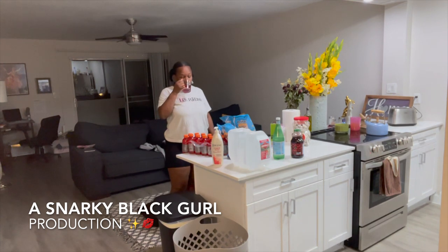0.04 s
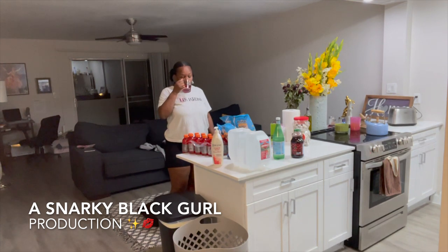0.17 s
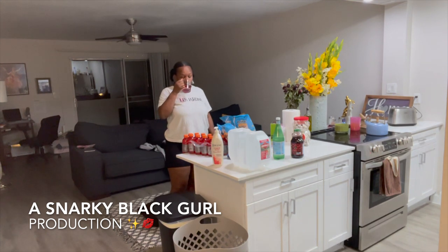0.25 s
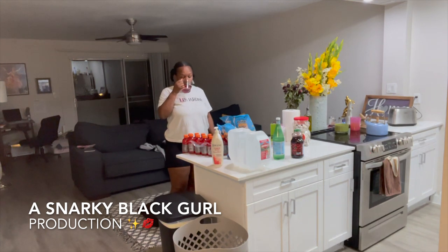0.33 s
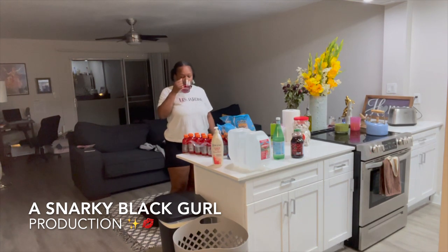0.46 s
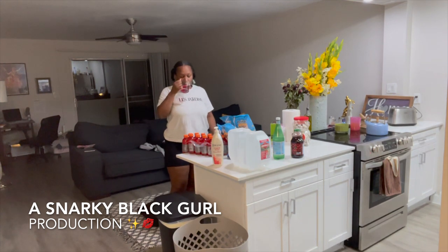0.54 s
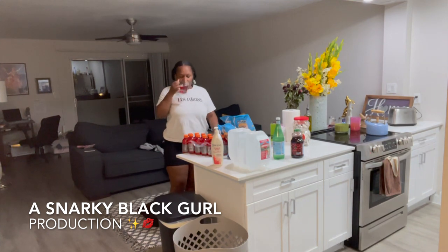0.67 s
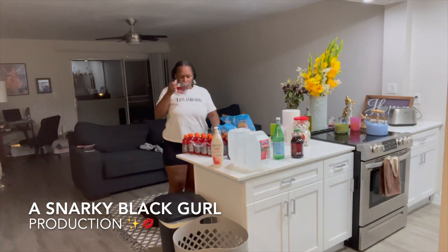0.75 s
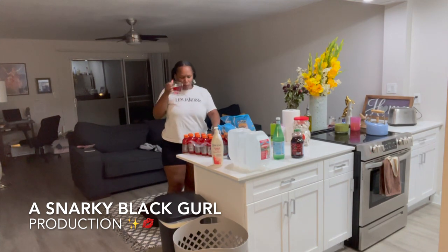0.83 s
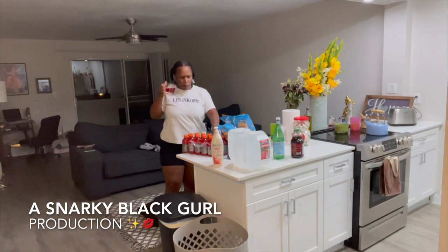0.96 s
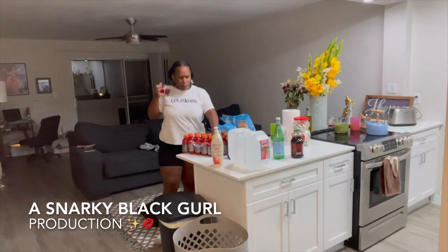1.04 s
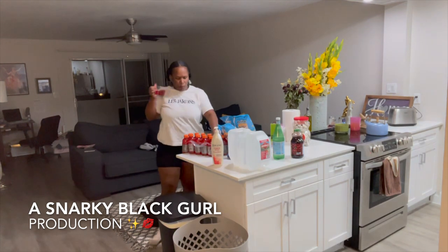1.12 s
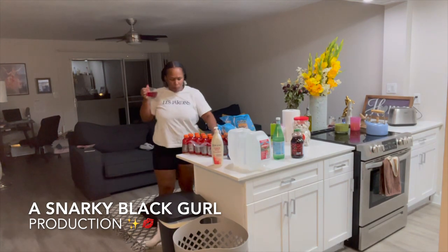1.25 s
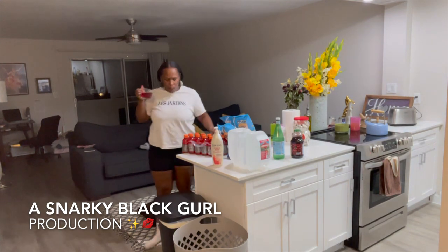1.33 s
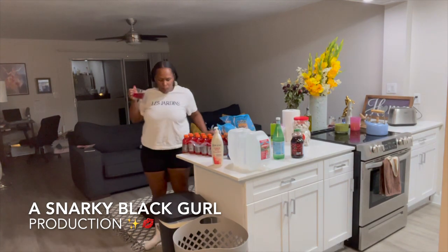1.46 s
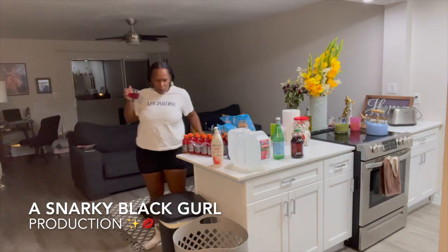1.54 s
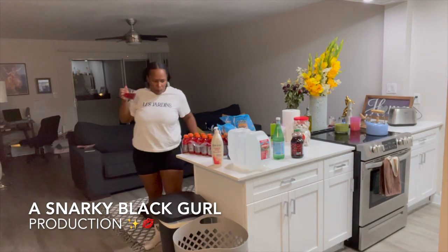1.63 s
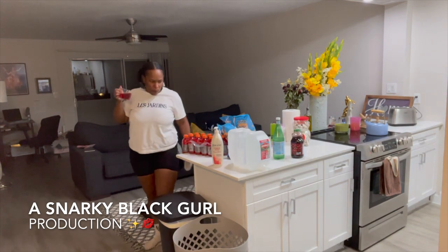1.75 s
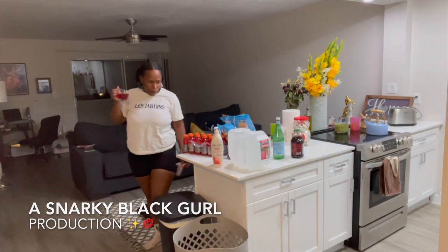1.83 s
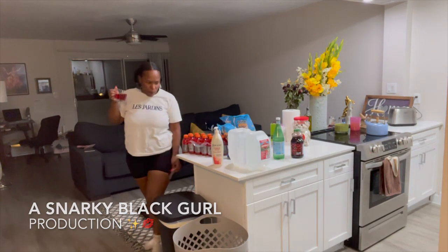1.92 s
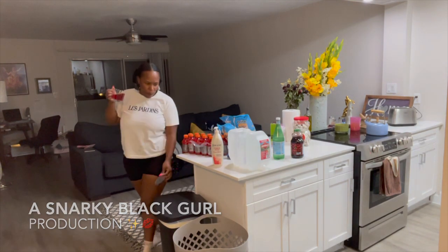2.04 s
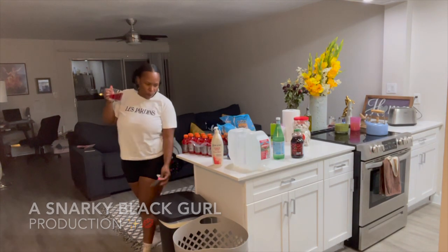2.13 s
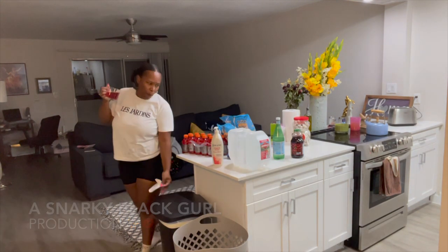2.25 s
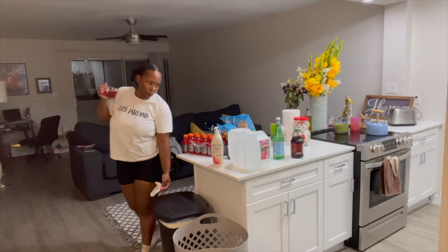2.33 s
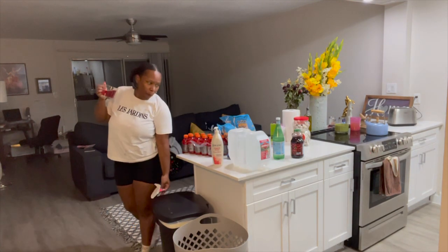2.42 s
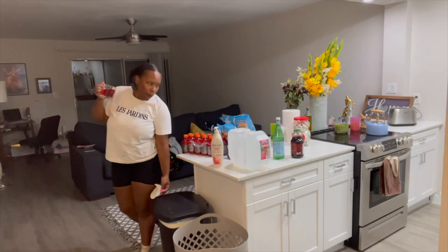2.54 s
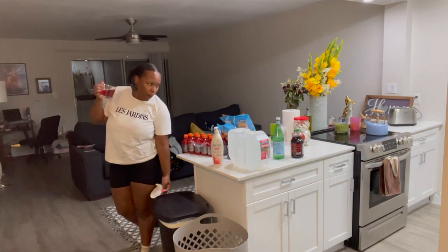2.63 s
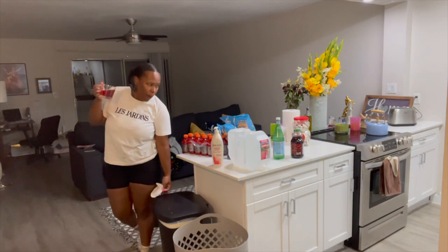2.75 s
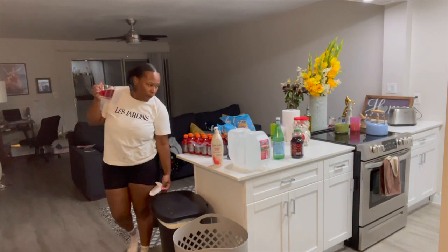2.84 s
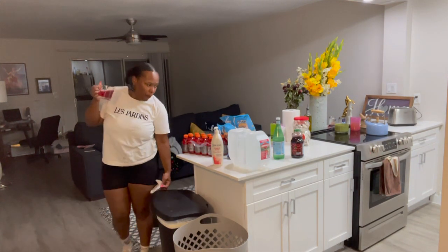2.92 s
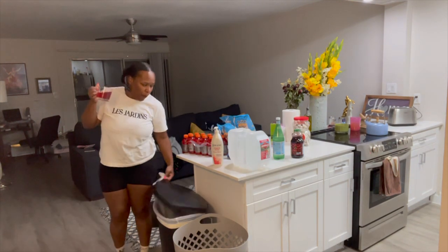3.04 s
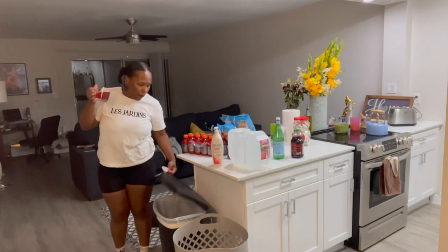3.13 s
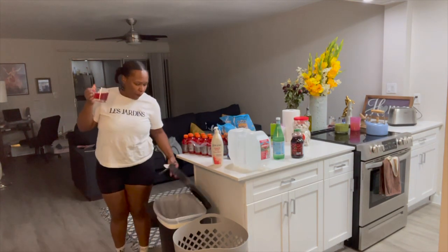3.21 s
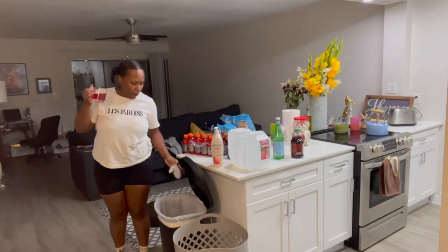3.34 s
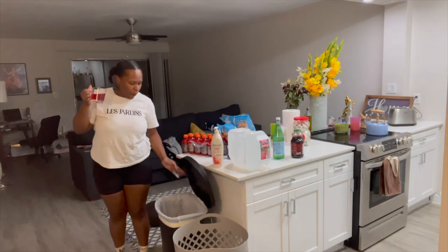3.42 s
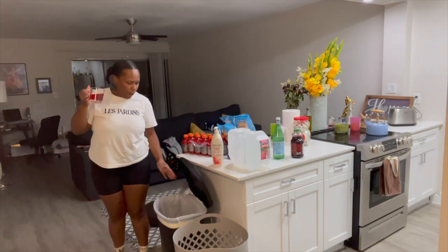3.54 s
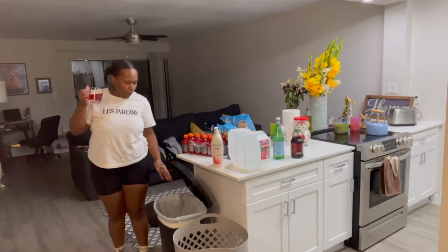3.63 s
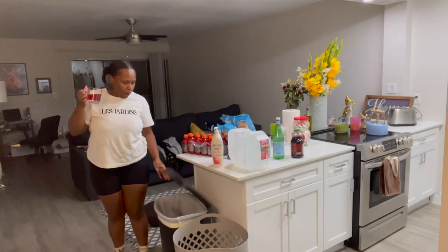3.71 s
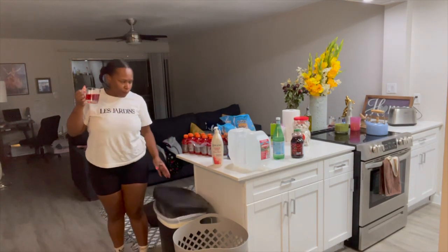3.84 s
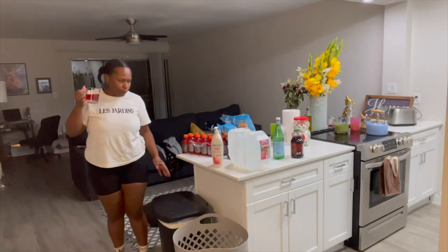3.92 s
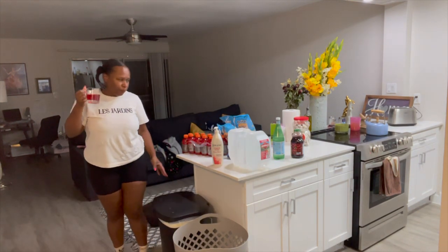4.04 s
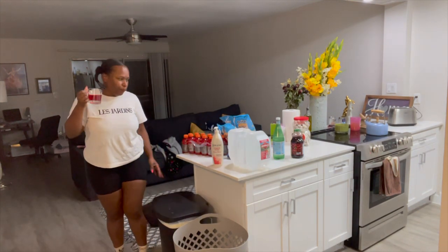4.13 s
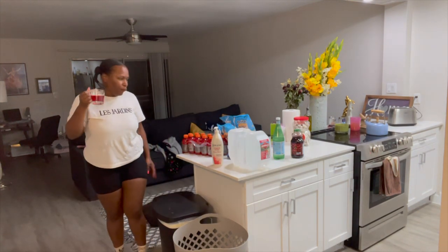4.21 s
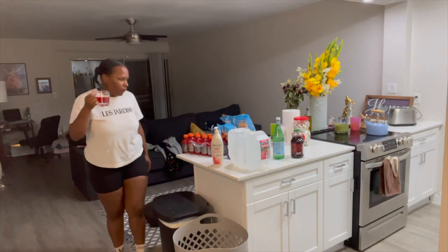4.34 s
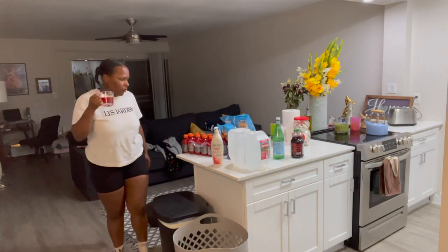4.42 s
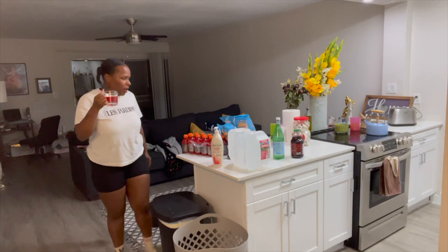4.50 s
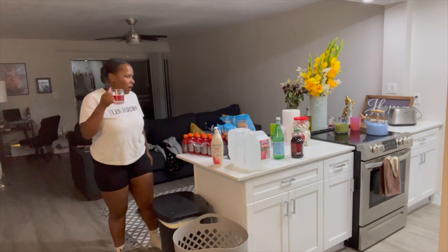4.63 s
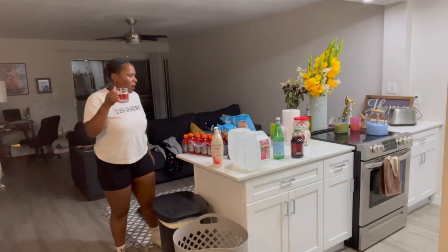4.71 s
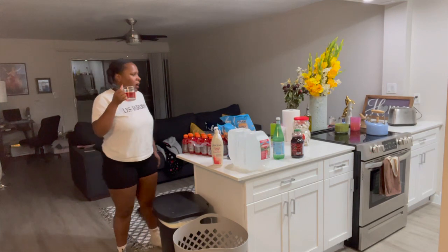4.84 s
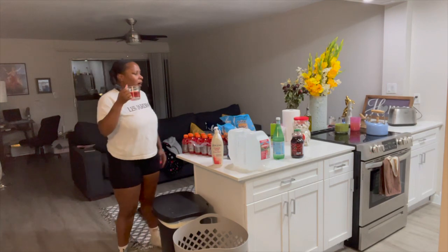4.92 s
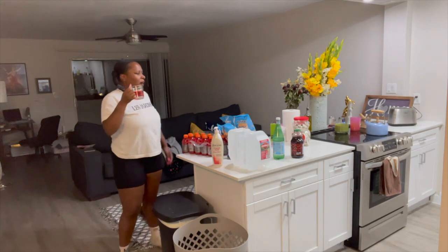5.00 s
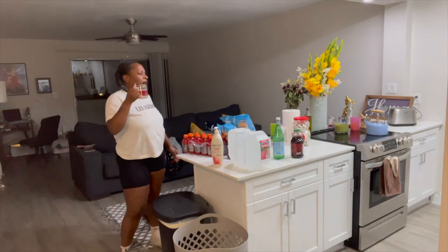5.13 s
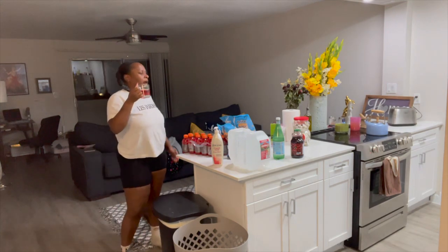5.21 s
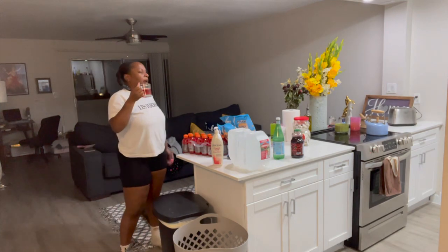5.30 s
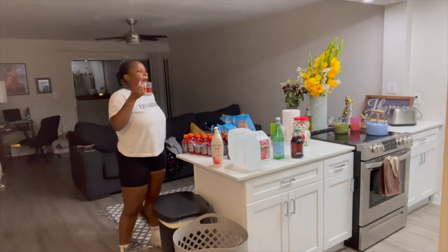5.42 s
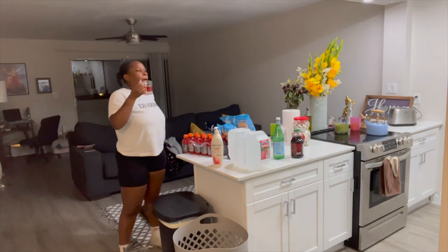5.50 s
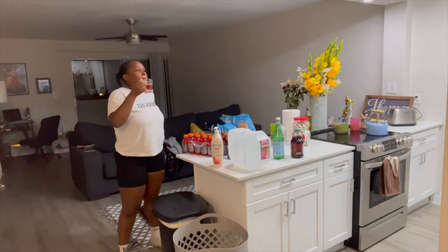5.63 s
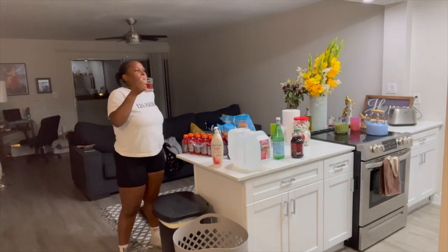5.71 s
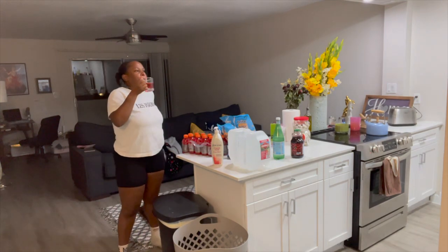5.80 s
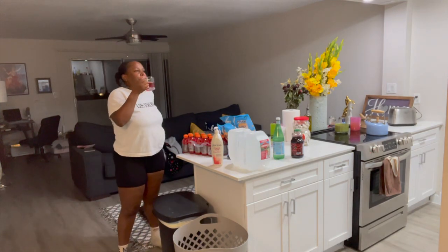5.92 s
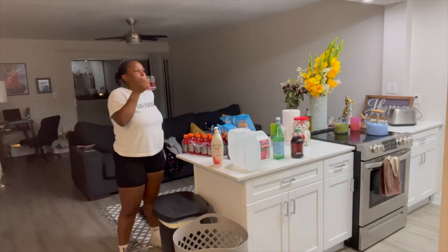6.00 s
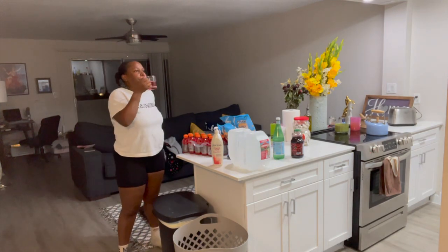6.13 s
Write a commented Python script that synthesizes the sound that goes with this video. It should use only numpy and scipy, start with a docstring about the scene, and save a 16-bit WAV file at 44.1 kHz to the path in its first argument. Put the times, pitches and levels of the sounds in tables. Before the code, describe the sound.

Throughout about six seconds, a refrigerator hums low and steady, gently wavering in level and stronger at left, with a deeper motor tone coming and going beneath soft, dull air noise. Until 3.2 s there is little else: a small tick at 1.1 s, barely audible slipper scuffs from 1.1 to 3.2 s, a faint rustle and a weak low bump near 2.7 s. At 3.33-3.37 s a plastic bin lid swings up and cracks against a cabinet, a sharp knock with a hollow body. It wobbles with soft boomy bumps, notably at 3.42 and 3.6 s. At 3.93 s it drops on its rim, a fuller, deeper clap with small rebounds until 4.1 s. Hard-room echoes fade within about half a second. A clear little tick comes at 4.46 s, then hum, dipping and swelling again toward the end, with very faint rustling at 5.6-6 s.

```python
"""A pedal bin's plastic lid swings up, knocks a cabinet and wobbles, then drops on its rim in an open kitchen.
Contacts are bursts of noise that excite short edge rings; blows ring the damped low modes of the hollow body.
A refrigerator hums as two sine lines over filtered air noise; slippers scuff and a faint rustle rubs as gritty
noise; short faint ticks are a click with two decaying sines. Sparse decaying echoes form the hard room."""
import sys
import numpy as np
from scipy import signal
from scipy.fft import rfft, irfft
from scipy.io import wavfile
from scipy.ndimage import uniform_filter1d

SR = 44100
rng = np.random.default_rng(int(sys.argv[2]) if len(sys.argv) > 2 else 0)


def master(y):
    """Save y as 16-bit WAV."""
    cut = np.clip(np.atleast_2d(y).T, -1, 1)
    pcm = np.round(cut * 32767)  # scale
    wavfile.write(sys.argv[1], SR, pcm.astype(np.int16))


def volts_from_db(level):
    """Convert decibel levels to linear amplitude ratios."""
    exponent = np.asarray(level, float) / 20
    return 10 ** exponent


N = 271656  # length in samples

# spectrum of the lid's edge against the cabinet: f/Hz, relative level per Hz/dB
CABINET_CRACK = [(250, -38.5), (420, -4.5), (520, 4), (750, -6), (1200, -3.5), (1500, -5), (2600, -11.5),
                 (3400, -23), (6500, -30.5), (10000, -38), (16000, -42.5)]
# spectrum of the lid's edge against the rim: f/Hz, relative level per Hz/dB
RIM_CRACK = [(150, -9.5), (320, 2), (600, 4.5), (900, 1), (1400, -6.5), (2500, -7), (4200, -21),
             (5200, -19), (7000, -20.5), (10000, -32.5), (16000, -42)]
# short rings of the plastic edge struck by the cabinet: f/Hz, relative level/dB, t60/s
CABINET_SNAP = [(1095, -9.5, 0.073), (1410, 3, 0.032), (2617, 4.5, 0.01), (4140, -23, 0.024)]
# short rings of the plastic edge struck by the rim: f/Hz, relative level/dB, t60/s
RIM_SNAP = [(1046, -11.5, 0.052), (2316, -5.5, 0.019), (3950, 0, 0.0065), (6980, -22, 0.011),
            (9670, -19.5, 0.0078)]
# contacts of the lid's edge, cabinet going up and rim coming down:
# t/s, struck part, peak level/dB, nominal rise/ms, level of the edge ring relative to the contact/dB
KNOCKS = [(3.329, "cabinet", -25.5, 3.7, -19), (3.345, "cabinet", -24, 5.5, -14),
          (3.360, "cabinet", -19, .5, 8.5), (3.365, "cabinet", -11.5, 0.48, -8),
          (3.415, "cabinet", -26, 3.3, -10), (3.437, "cabinet", -32, 3, -12),
          (3.575, "cabinet", -34.5, 5.7, -20), (3.609, "cabinet", -29.5, 2.7, -25),
          (3.648, "cabinet", -35.5, 2.6, -14), (3.679, "cabinet", -45, 2.5, -15),
          (3.926, "rim", -19.5, 0.9, -8.5), (3.929, "rim", -14.5, 1.38, -0.5),
          (3.941, "rim", -22.5, 3.3, -12.5), (3.963, "rim", -30, 4.9, -4.5), (4.01, "rim", -28, 2.2, -18),
          (4.113, "rim", -39, 2.7, -10)]
# modes of the hollow bin and the floor under it: f/Hz, relative level/dB, t60/s
BIN_BODY = [(67.2, -17.5, 0.42), (112, -0.5, 0.1), (148.8, 0.5, 0.16), (177.6, 0.5, 0.089),
            (263.5, -4, 0.13), (322, -2.5, 0.084), (528, -8.5, 0.058)]
# names of those modes, low to high
MODE_NAMES = ["floor", "base", "wall", "flank", "neck", "lid", "rim"]
# blows that shake the whole bin: t/s, peak level/dB, softness/(dB per octave)
THUDS = [(3.340, -12, 7), (3.371, -20.5, 2), (3.575, -19, 2), (3.648, -24.5, 1.5), (3.909, -23, -3),
         (3.932, -8, 3.5), (3.95, -12, -4), (4.019, -20.5, 3.5)]
# single modes that swell and fade as the lid rocks: start t/s, length/s, peak level/dB, mode name
BOOMS = [(2.74, .11, -38.5, "flank"), (3.372, 0.05, -18, "base"), (3.42, 0.06, -17, "wall"),
         (3.549, 0.14, -29.5, "floor"), (3.625, 0.055, -17.5, "wall"), (3.647, 0.052, -33, "lid"),
         (3.72, .03, -26, "wall"), (3.78, 0.044, -33, "flank"), (3.931, 0.033, -21.5, "lid"),
         (3.995, .055, -20, "wall"), (4.0, 0.046, -18.5, "base")]
# short faint ticks, some within the dying sound of the lid: t/s, peak level/dB, ring f/Hz, second ring f/Hz
TICKS = [(1.094, -38.5, 5660, 1710), (1.946, -44, 2340, 1950), (2.905, -43, 1600, 2690),
         (3.255, -44.5, 4600, 3100), (3.587, -45, 6600, 4250), (3.807, -43.5, 2360, 1460),
         (4.189, -44, 1950, 1330), (4.305, -48.5, 1650, 2630), (4.457, -33.5, 3150, 2720)]
# slippers sliding on the floor: start t/s, length/s, rms level/dB
SCUFFS = [(1.08, .12, -69), (1.567, 0.14, -65), (1.879, 0.21, -62.5), (2.602, .12, -69.5),
          (2.78, 0.095, -69), (2.949, 0.14, -58), (3.198, 0.09, -59.5), (3.575, 0.033, -67),
          (3.755, .13, -63.5)]
# spectrum of a scuff, also of a tick's click: f/Hz, relative level per Hz/dB
SCUFF_COLOUR = [(500, -17), (2000, 6), (5000, -1), (10000, -3.5), (16000, -2.5)]
# faint dull rustle: start t/s, length/s, rms level/dB
RUSTLES = [(1.24, 0.068, -59.5), (2.84, 0.096, -62), (3.882, 0.077, -45.5), (5.63, 0.15, -58),
           (5.8, 0.21, -63)]
# spectrum of the rustle: f/Hz, relative level per Hz/dB
RUSTLE_COLOUR = [(600, -29), (1500, 6), (2700, -3.5), (4000, -12.5), (10000, -26)]
# compressor hum, wavering as a body moves through the standing wave: t/s, rms level/dB
HUM = [(0, -35), (1.8, -35), (2.1, -33.5), (3.3, -35.5), (3.6, -38), (5.2, -39.5), (5.6, -36),
       (6.16, -32.5)]
# the motor shaft's line, which comes and goes: t/s, rms level/dB
SHAFT = [(0, -52), (.4, -46.5), (1.3, -53), (1.6, -61), (2.2, -57), (2.55, -43), (5.3, -47), (5.6, -62),
         (6.16, -63)]
# spectrum of the air noise: f/Hz, relative level per Hz/dB
AIR = [(25, -40), (45, -0.5), (70, -3.5), (100, -4.5), (160, -3), (210, -16.5), (260, -8), (350, -15),
       (430, -18), (900, -19), (1200, -29.5), (3000, -36.5), (7000, -50), (11000, -55.5), (16000, -66.5)]
# fuzzy duct tones: centre f/Hz, width at half amplitude/Hz, rms level/dB
DUCT = [(257.8, 4.7, -59.5), (342.4, 39, -60.5), (370.3, 7.2, -58.5)]
# decay of the room: f/Hz, t60/s
ROOM = [(60, 0.6), (160, 0.62), (420, 0.81), (1100, 0.65), (2910, 0.54), (7680, 0.39)]
# gain of the side signal: f/Hz, level/dB
SIDE_GAIN = [(40, -42.5), (95, -29), (120, -28), (148, -14.5), (200, -7), (380, 0), (1000, 1), (2400, -0.1),
             (8000, 0.5), (15000, -3.5)]
# share of the bin's mid that leans left: f/Hz, level/dB
LEFT_LEAN = [(100, -43), (150, -7.5), (600, -14), (1000, -31)]
# overall tone colour: f/Hz, level/dB
TONE_COLOUR = [(20, -14), (40, 1), (7300, 2), (8300, -3.5), (10000, 1.5), (11500, -3.5), (12600, -24),
               (14500, 0), (15600, 2.5), (16300, -28)]


def evened(x):
    """Normalisation: scales to an rms of 1."""
    return x / np.sqrt(np.mean(x ** 2) + 1e-20)


def read(points, hz):
    """Interpolation of a table along a log-frequency axis."""
    f, value = np.transpose(points)
    return np.interp(np.log(hz + 1), np.log(f + 1), value)


def coloured(x, points):
    """Minimum-phase filtering: the phase is the Hilbert transform of the log gain."""
    log_gain = read(points, abs(np.fft.fftfreq(8192, 1 / SR))) * np.log(10) / 20
    phase = -signal.hilbert(log_gain).imag
    taps = np.fft.ifft(np.exp(log_gain + 1j * phase)).real[:4096]
    return signal.oaconvolve(x, taps[None], axes=1)[:, :x.shape[1]]


def add(mix, s, sound, peak_db):
    """Superposition: adds a mid/side sound at s seconds, its mid scaled to the peak level."""
    part = mix[:, round(s * SR):][:, :sound.shape[1]]
    part += volts_from_db(peak_db) * sound[:, :part.shape[1]] / abs(sound[0]).max()


def room(x, wet_db):
    """Reverberation: sparse echoes decay at each band's own rate, drawn apart for mid and side."""
    echoes = np.zeros((2, SR))
    at = np.arange(200, SR - 20, 20) + rng.integers(0, 20, (2, (SR - 201) // 20))
    np.put_along_axis(echoes, at, rng.choice([-1., 1.], at.shape), 1)
    hz, t, bands = signal.stft(echoes, SR, nperseg=256)
    t60 = np.maximum(read(ROOM, hz), 0.05)[:, None]
    tail = signal.istft(bands * volts_from_db(-60 * t / t60), SR, nperseg=256)[1]
    tail = tail / np.linalg.norm(tail[0])
    return x + volts_from_db(wet_db) * signal.fftconvolve(x, tail, axes=1)[:, :N]


def fridge():
    """Periodic machine sound: two lines of steady pitch and varying level, louder on the left."""
    t = np.arange(N) / SR
    tone = np.zeros(N)
    for hz, levels in [(119.7, HUM), (57.5, SHAFT)]:
        rms = volts_from_db(np.interp(t, *np.transpose(levels)))
        tone += rms * np.sqrt(2) * np.sin(2 * np.pi * hz * t)
    return np.array([tone, 0.23 * tone])


def air():
    """Broadband flow noise: far ventilation as filtered noise, with resonance peaks for the duct."""
    hz = np.fft.rfftfreq(N, 1 / SR)
    out = volts_from_db(-43) * evened(coloured(rng.standard_normal((2, N)), AIR))
    for centre_hz, width_hz, db in DUCT:
        resonance = 1 / (1 + (2 * (hz - centre_hz) / width_hz) ** 2)
        tone = irfft(rfft(rng.standard_normal((2, N))) * resonance, N)
        out = out + volts_from_db(db) * evened(tone)
    return out


def rubbing(strokes, colour):
    """Sliding friction: gritty noise that swells and fades with each stroke."""
    t = np.arange(N) / SR
    stroke = np.zeros(N)
    for s, length, db in strokes:
        stroke += volts_from_db(db) * np.sin(np.pi * np.clip((t - s) / length, 0, 1)) ** 0.38
    grit = rng.standard_normal((2, N)) * volts_from_db(2.3 * rng.exponential(1, N))  # random lifts in dB
    return room(stroke * evened(coloured(grit, colour)), -4.5)


def chatter(envelope):
    """Multiple impact: many tiny contacts as noise under an envelope, its spectrum flattened."""
    x = rng.standard_normal((2, len(envelope)))
    for _ in range(5):
        local_rms = np.sqrt(abs(uniform_filter1d(x ** 2, size=64, axis=1)) + 1e-12)
        spectrum = rfft(x * envelope / local_rms)
        x = irfft(spectrum / (abs(spectrum) + 1e-12), len(envelope))  # phases only
    return x * np.sqrt(envelope / envelope.max())  # steepens the envelope further


def ticks(wet_db):
    """Damped vibration: a bare click and two very short rings."""
    second_share, click_per_khz = 0.58, 0.22  # high ticks click more than they ring
    ring_cycles = 6.7  # a ring falls to 1/e in this many cycles
    out, t = np.zeros((2, N)), np.arange(2048) / SR
    for s, db, hz, second_hz in TICKS:
        click = coloured(chatter(np.exp(-t / 0.009)), SCUFF_COLOUR)
        click = click_per_khz * hz / 1000 * click / abs(click).max()
        rings = np.zeros(len(t))
        for f, share in [(hz, 1), (second_hz, second_share)]:
            rings += share * np.sin(2 * np.pi * f * t) * np.exp(-f * t / ring_cycles)
        rings *= 1 - np.exp(-t / 0.00041)  # rounded onset
        add(out, s, click + rings, db)
    return room(out, wet_db)


def booms(wet_db):
    """Single-mode response: one note of the bin swells and fades as the lid rocks."""
    out, t = np.zeros((2, N)), np.arange(SR // 3) / SR
    for s, length, db, mode in BOOMS:
        hz = BIN_BODY[MODE_NAMES.index(mode)][0]
        swell = np.sin(np.pi * np.minimum(t / length, 1)) ** 2
        boom = swell * np.sin(2 * np.pi * hz * t)
        add(out, s, np.array([boom, boom]), db)
    return room(out, wet_db)


def cracks(struck, colour, snap, wet_db):
    """Impact excitation: the lid's edge chatters for a few ms and sets off its short rings."""
    out, rung = np.zeros((2, N)), np.zeros((2, N))
    t = np.arange(8192) / SR
    ms = 1000 * t
    ring = sum(volts_from_db(db - 60 * t / t60) * np.sin(2 * np.pi * hz * t) for hz, db, t60 in snap)
    for s, part, db, rise_ms, snap_db in KNOCKS:
        if part != struck:
            continue
        length_ms = 3 + 1.6 * rise_ms  # a contact that starts softly chatters longer
        contacts = chatter((1 - np.exp(-ms / rise_ms)) * np.exp(-ms / length_ms))
        add(out, s, coloured(contacts, colour), db)
        add(rung, s, signal.fftconvolve(contacts, ring[None], axes=1), db + snap_db)
    return room(out, wet_db) + room(rung, wet_db - 10)  # the rings are heard mostly at first hand


def thuds(wet_db):
    """Modal superposition: each blow rings the hollow bin; a soft one leaves the upper modes out."""
    out, t = np.zeros((2, N)), np.arange(SR // 3) / SR
    for s, peak_db, soft_db in THUDS:
        ring = np.zeros(len(t))
        for hz, db, t60 in BIN_BODY:
            mode_db = db - soft_db * np.log2(hz / 100)
            ring += volts_from_db(mode_db - 60 * t / t60) * np.sin(2 * np.pi * hz * t)
        ring *= 1 - np.exp(-t / 0.0035)  # rounded onset
        add(out, s, np.array([ring, 1.3 * ring]), peak_db)
    return room(out, wet_db)


def scene():
    """Mid/side stereophony: the side loses its bass, as with close microphones; the bin's low end leans left."""
    lid = cracks("cabinet", CABINET_CRACK, CABINET_SNAP, 1.6) + cracks("rim", RIM_CRACK, RIM_SNAP, 3.9)
    lid = lid + booms(-5.0) + thuds(-5.0)
    friction = rubbing(SCUFFS, SCUFF_COLOUR) + rubbing(RUSTLES, RUSTLE_COLOUR)
    both = fridge() + air() + friction + ticks(1.7) + lid
    lean = irfft(rfft(lid[0]) * volts_from_db(read(LEFT_LEAN, np.fft.rfftfreq(N, 1 / SR))), N)
    mid = both[0]
    side = coloured(both[1:], SIDE_GAIN)[0] + lean
    return np.array([mid + side, mid - side])  # left, right


def low_pass(x):
    """Removes everything above the highest recorded frequency."""
    return signal.sosfilt(signal.butter(12, 16490, fs=SR, output="sos"), x)


def record(dry):
    """Linear filtering, then saturation: a fixed filter colours the treble and drops the deepest bass."""
    ceiling = 0.85  # of full scale
    filtered = coloured(dry, TONE_COLOUR)
    mix = ceiling * np.tanh(filtered / ceiling)  # rounds off the peaks
    return low_pass(mix)


dry = scene()
out = record(dry)
master(out)
```